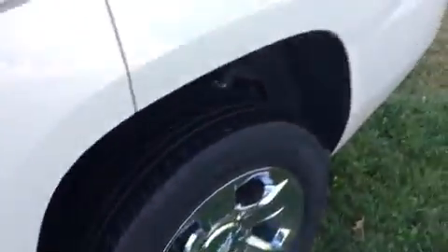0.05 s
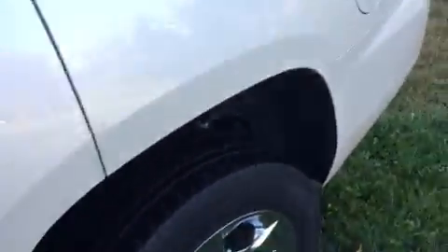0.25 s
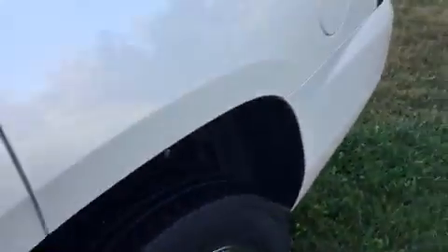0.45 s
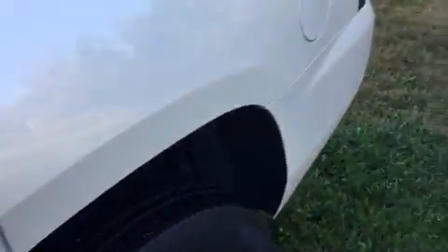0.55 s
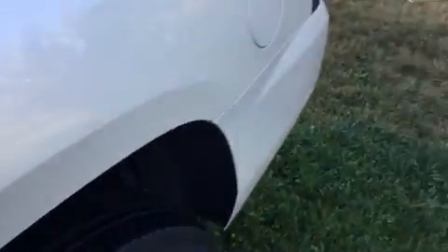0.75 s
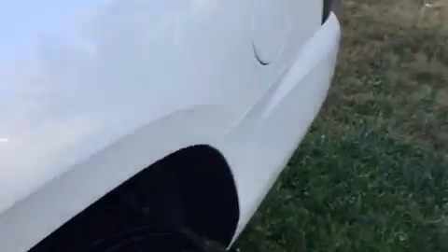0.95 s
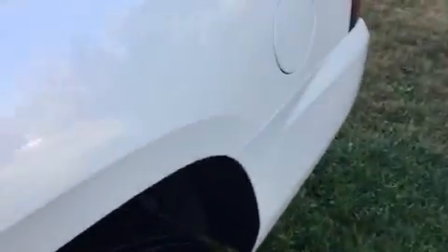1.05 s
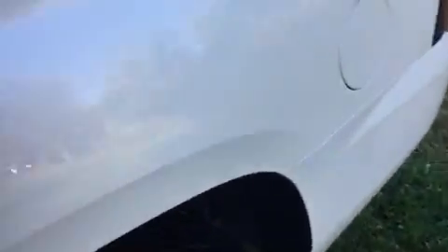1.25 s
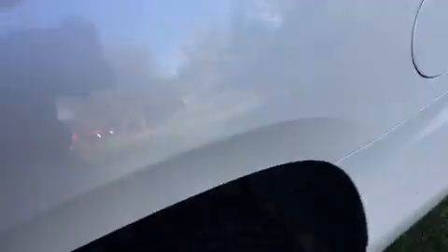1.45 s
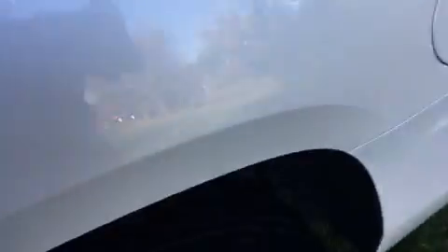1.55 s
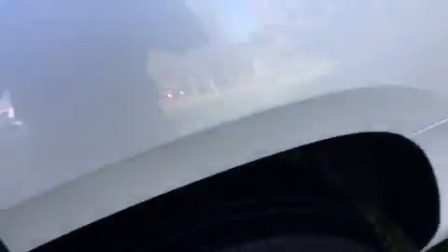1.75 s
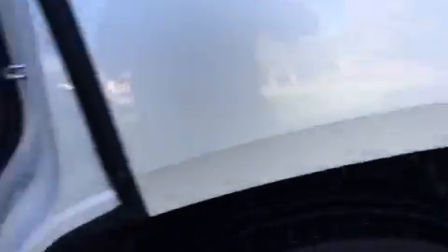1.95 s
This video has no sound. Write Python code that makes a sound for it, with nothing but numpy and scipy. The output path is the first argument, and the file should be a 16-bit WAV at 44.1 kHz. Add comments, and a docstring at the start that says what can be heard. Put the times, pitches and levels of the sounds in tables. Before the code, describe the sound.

Outdoors on a quiet grassy lot, a large vehicle's door bangs shut almost at once, deep and dry; then come lighter double clunks of the latch with faint hand rustle, and a last light metallic click.

```python
"""Outdoors, a heavy vehicle door is slammed: the seal touches, the latch bangs home, panels rattle out.
Later the handle and latch knock and click more lightly, with a faint rustle of sleeve and hand.
Far traffic hums and hisses as coloured noise; a light breeze rumbles as resonant low noise.
The door is a bank of struck modes plus sagging sines; clicks are noise bursts, rattle is random ticks."""
import sys
import numpy as np
from scipy import signal
from scipy.io import wavfile

SR = 44100
rng = np.random.default_rng(int(sys.argv[2]) if len(sys.argv) > 2 else 0)


def ratio_of_db(decibels):
    """Turn decibels (scalar or array-like) into linear amplitude factors; 0 dB maps to 1."""
    return 10 ** (np.asarray(decibels, float) / 20)


def log_audio(samples):
    """Write samples as a 16-bit WAV file to the path given in sys.argv[1]."""
    # one column per channel
    frames = np.atleast_2d(samples).T
    # limit to full scale, then quantise
    limited = np.clip(frames, -1, 1)
    pcm = np.round(limited * 32767).astype(np.int16)
    wavfile.write(sys.argv[1], SR, pcm)


N = 88200


def rms_one(x):
    """Scale to rms 1."""
    return x / np.sqrt(np.mean(x ** 2) + 1e-20)


def in_time(rows):
    """Interpolate the columns of a time table to every sample."""
    s, *columns = np.transpose(rows)
    return [np.interp(np.arange(N) / SR, s, c) for c in columns]


def drift(rate_hz):
    """Slow random wander of rms 1: noise through two equal poles at rate_hz."""
    hop = 40  # samples per slow step
    r = np.exp(-2 * np.pi * rate_hz * hop / SR)
    noise = rng.standard_normal(N // hop + 2002)
    slow = signal.lfilter([1], [1, -2 * r, r * r], noise)[2000:]  # drop the filter's start-up
    return np.interp(np.arange(N) / hop, np.arange(len(slow)), rms_one(slow))


def bandpass(x, order, low_hz, high_hz):
    """Butterworth band-pass."""
    return signal.sosfilt(signal.butter(order, [low_hz, high_hz], "band", fs=SR, output="sos"), x)


def resonance(x, hz, width_hz):
    """Two-pole peak with gain 1 on top."""
    r = np.exp(-np.pi * width_hz / SR)
    poles = [1, -2 * r * np.cos(2 * np.pi * hz / SR), r * r]
    return signal.lfilter([(1 - r * r) / 2, 0, (r * r - 1) / 2], poles, x)


def coloured(sources, spectrum, tilt_db, patchy_db):
    """Half-octave bands, alternating between two sources, each with level, moving tilt and flicker."""
    hz, density_db = np.transpose(spectrum)
    edges_hz = 24 * 2 ** np.arange(0, 9.1, 0.5)
    out = 0
    for k, (low_hz, high_hz) in enumerate(zip(edges_hz, edges_hz[1:])):
        centre_hz = np.sqrt(low_hz * high_hz)
        band = bandpass(sources[k % 2], 2, low_hz, high_hz)
        level_db = np.interp(np.log(centre_hz), np.log(hz), density_db)
        octaves = np.log2(max(centre_hz, 400) / 1500)  # tilt pivots at 1.5 kHz
        out = out + band * ratio_of_db(level_db + tilt_db * octaves + patchy_db * drift(10))
    return rms_one(out)


# far traffic in time: start_s, level_db (before lift_db), tilt_db_per_octave
TRAFFIC = [(0, -50.5, 2), (.17, -51.5, 4), (.35, -53, 0.5), (.6, -50, 1.5), (.9, -49.5, 1),
           (1.17, -47, 0.5), (1.39, -49, .5), (1.5, -50, 1.5), (1.8, -48.5, 2), (2, -50.5, 0)]
# far traffic spectrum: freq_hz, relative_density_db_per_hz
TRAFFIC_COLOUR = [(25, -20), (45, -2.5), (66, -2), (130, -10.5), (267, -17), (500, -20), (700, -19.5),
                  (1230, -20.5), (2210, -28.5), (3580, -41.5), (5800, -38.5), (8000, -67), (11000, -36)]


def far_traffic():
    """Smooth noise in flickering bands, its level and brightness drifting."""
    lift_db = 7
    level_db, tilt_db = in_time(TRAFFIC)
    noise = rng.standard_normal((2, N))
    return ratio_of_db(level_db + lift_db) * coloured(noise, TRAFFIC_COLOUR, tilt_db, patchy_db=1.5)


# breeze rumble in time: start_s, level_db
RUMBLE = [(0, -42), (.35, -34), (.45, -44.5), (.53, -42), (.58, -36.5), (.7, -46.5), (.9, -93), (1.2, -52),
          (1.28, -47), (1.4, -44.5), (1.5, -39), (1.6, -48), (1.85, -38), (2, -73)]


def breeze_rumble():
    """Lumpy low rumble: noise through the same broad resonance twice."""
    centre_hz, width_hz, lump_db = 56.8, 78, 1.5
    once = resonance(rng.standard_normal(N), centre_hz, width_hz)
    low = resonance(once, centre_hz, width_hz)
    level_db, = in_time(RUMBLE)
    return rms_one(low) * ratio_of_db(level_db + lump_db * drift(24))


# sleeve and hand rustling in time: start_s, level_db
RUSTLE = [(.97, -59.5), (1.04, -48), (1.08, -51), (1.12, -39.5), (1.14, -54), (1.28, -53), (1.36, -55.5),
          (1.42, -65)]


def rustle():
    """Faint bright friction while the handle is worked: band noise with an unsteady level."""
    level_db, = in_time(RUSTLE)
    hiss = bandpass(rng.standard_normal(N), 1, 1500, 3500)
    t = np.arange(N) / SR
    sounding = (t > RUSTLE[0][0]) * (t < RUSTLE[-1][0])
    return ratio_of_db(level_db + 2.0 * drift(27)) * rms_one(hiss) * sounding


# panel and trim rattle in time: start_s, level_db (before lift_db), tilt_db_per_octave
RATTLE = [(.184, -45, -4), (.191, -39, -7.5), (.196, -24, -3.5), (.203, -18.5, -4), (.215, -21.5, -5),
          (.228, -26.5, -1), (.238, -22, -5), (.262, -33.5, -3), (.293, -34.5, -4.5), (.305, -41, -5.5),
          (.34, -63, 4.5)]
# rattle spectrum: freq_hz, relative_density_db_per_hz
RATTLE_COLOUR = [(180, -9), (300, -7), (789, -26), (1030, -23), (1760, -18.5), (2630, -20.5), (3240, -22.5),
                 (4500, -35.5), (10500, -30), (13600, -79), (22000, -120)]


def rattle():
    """Dense uneven ticks of loose panels and trim, coloured by the door."""
    ticks_per_s, spread_db, lift_db, tail_db_per_s = 2500, 2.0, 5.5, 300
    level_db, tilt_db = in_time(RATTLE)
    strength = ratio_of_db(spread_db * np.minimum(rng.exponential(1, (2, N)), 5))
    ticks = strength * rng.choice([-1, 1], (2, N))
    ticks = ticks * (rng.random((2, N)) < ticks_per_s / SR) + 1e-18
    t = np.arange(N) / SR
    sounding = (t > RATTLE[0][0]) * ratio_of_db(-tail_db_per_s * np.maximum(t - RATTLE[-1][0], 0))
    return ratio_of_db(level_db + lift_db) * sounding * coloured(ticks, RATTLE_COLOUR, tilt_db, patchy_db=-1.0)


# latch clicks: start_s, level_db (before trim_db), pitch_hz, width_hz, t60_s
CLICKS = [(.192, -24, 2380, 516, 0.12), (0.2012, -10, 8100, 6200, 0.023), (.202, -27.5, 5860, 500, .05),
          (.204, -19, 1790, 346, 0.065), (0.2018, -9, 1120, 1640, 0.052), (0.213, -21.5, 3500, 2460, 0.079),
          (.231, -29, 2480, 595, 0.063), (0.244, -24.5, 2400, 600, 0.036), (0.96, -45, 5400, 3000, 0.014),
          (1.0045, -24, 1870, 395, 0.019), (1.033, -35, 1380, 695, 0.045), (1.036, -35.5, 3070, 810, 0.043),
          (1.098, -30, 2200, 900, 0.024), (1.1073, -20, 2230, 484, 0.016),
          (1.107, -28.5, 7700, 5030, 0.011), (1.562, -38.5, 6500, 7000, 0.012),
          (1.562, -39, 2730, 1500, 0.079), (1.585, -25, 3360, 600, 0.019), (1.584, -34, 4420, 2380, 0.033),
          (1.585, -37, 7600, 5100, 0.015), (1.5847, -29, 1750, 1670, 0.074),
          (1.588, -27.5, 5420, 1180, 0.03)]


def latch_clicks():
    """Metal contact: an impulse plus chattering noise through a resonant band, dying away."""
    snap, trim_db = 0.84, -4  # snap: first contact against the chatter after it
    out = np.zeros(N)
    t = np.arange(SR // 10) / SR
    for start_s, level_db, pitch_hz, width_hz, t60_s in CLICKS:
        contact = snap * np.sqrt(SR / width_hz) * (t == 0)
        low_hz = max(pitch_hz - width_hz / 2, 100)
        burst = bandpass(rng.standard_normal(len(t)) + contact, 2, low_hz, pitch_hz + width_hz / 2)
        start = int(start_s * SR)
        out[start:start + len(t)] += rms_one(burst) * ratio_of_db(level_db + trim_db - 60 * t / t60_s)
    return out


# door thumps on the seal: start_s, level_db, start_hz, end_hz, glide_s, t60_s
THUMPS = [(.203, 0, 163.6, 140, 0.019, 0.086), (1.0911, -10, 237, 51.4, 0.0072, 0.071),
          (1.1043, -13, 192, 60.5, 0.0066, .06)]


def thumps():
    """The door bounces on its seal: a dying sine whose pitch sags as the seal relaxes."""
    attack_s = 0.001
    out = np.zeros(N)
    for start_s, level_db, start_hz, end_hz, glide_s, t60_s in THUMPS:
        start = int(start_s * SR)
        t = np.arange(N - start) / SR
        turns = end_hz * t + (start_hz - end_hz) * glide_s * (1 - np.exp(-t / glide_s))
        envelope = ratio_of_db(level_db - 60 * t / t60_s) * (1 - np.exp(-t / attack_s))
        out[start:] -= envelope * np.sin(2 * np.pi * turns)  # inward first
    return out


# blows on the door: start_s, strength_db, lowest_mode_hz, highest_mode_hz, share_of_free_t60
BLOWS = [(.186, -31.5, 152, 895, 0.57), (0.195, -46, 150, 900, 0.27), (.2030, -10, 274, 1200, 0.39),
         (0.2155, -13, 30, 110, 1.0), (0.2277, -14, 217, 486, 0.38), (0.26, -21.5, 99, 506, 0.57),
         (.288, -22.5, 120, 360, 0.74), (0.996, -29, 120, 400, 0.4), (1.032, -30, 252, 450, 0.25),
         (1.072, -29.5, 250, 400, 0.27), (1.088, -31, 250, 900, 0.54), (1.116, -41, 60, 198, 0.34),
         (1.1003, -17.5, 280, 480, 0.26), (1.139, -29.5, 81, 250, 0.52), (1.1714, -22, 375, 640, 0.29),
         (1.175, -31, 50, 120, 0.18), (1.587, -32, 400, 810, 0.45), (1.596, -39.5, 147, 715, 0.9),
         (1.763, -31, 101, 357, 0.14)]
# door modes: freq_hz, level_db, free_t60_s
DOOR = [(53.8, 9, 0.34), (90, 0.5, 0.29), (141, 12, 0.08), (193, -17, 0.98), (217.6, -11, 0.5),
        (286.2, -7, 0.27), (343.5, -4.5, 0.26), (386, -5, 0.14), (435, -5, 0.2), (544, -11, 0.19),
        (594, -4.5, 0.19), (638, -1, 0.063), (798, 4.5, 0.038), (843, -13, 0.14), (999, -7.5, 0.23)]


def door_body():
    """Each blow rings the modes its place and hardness reach; all swing inward first."""
    spread_db, contact_cycles = 3, 0.57  # unevenness per mode; time constant of a mode's swell
    out = np.zeros(N)
    for start_s, strength_db, low_hz, high_hz, share in BLOWS:
        start = int(start_s * SR)
        t = np.arange(N - start) / SR
        for hz, level_db, free_t60_s in DOOR:
            reach = -1 / np.sqrt((1 + (low_hz / hz) ** 6) * (1 + (hz / high_hz) ** 6))
            swell = 1 - np.exp(-t * hz / contact_cycles)
            peak_db = strength_db + level_db + rng.normal(0, spread_db)
            decay = ratio_of_db(peak_db - 60 * t / (free_t60_s * share))
            out[start:] += reach * swell * decay * np.sin(2 * np.pi * hz * t)
    return out


def scene():
    """All sources, one channel."""
    background = far_traffic() + breeze_rumble()
    handling = rustle() + rattle() + latch_clicks()
    return (background + handling + thumps() + door_body())[None]


def roll_off(x):
    """The treble ends steeply here."""
    return signal.sosfilt(signal.butter(12, 11110, fs=SR, output="sos"), x)


def record(dry):
    """The deepest bass is lost, peaks are rounded, the top is cut."""
    low_cut_hz, ceiling, stopband_hz = 30, 1.1, 11300
    no_bass = signal.sosfilt(signal.butter(2, low_cut_hz, "high", fs=SR, output="sos"), dry)
    rounded = ceiling * np.tanh(no_bass / ceiling)
    mix = signal.sosfilt(signal.cheby2(8, 50, stopband_hz, fs=SR, output="sos"), rounded)
    return roll_off(mix)


dry = scene()
out = record(dry)
log_audio(out)
```